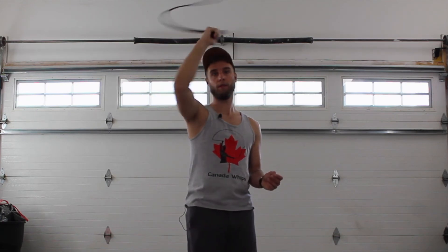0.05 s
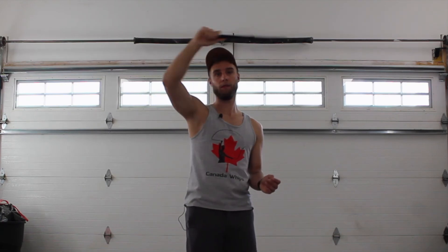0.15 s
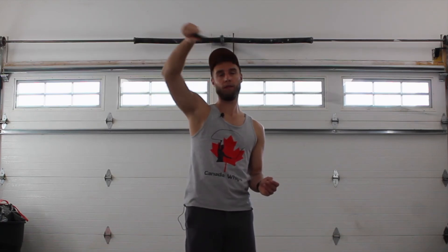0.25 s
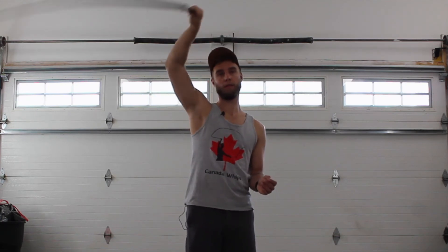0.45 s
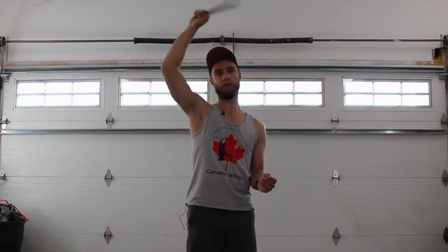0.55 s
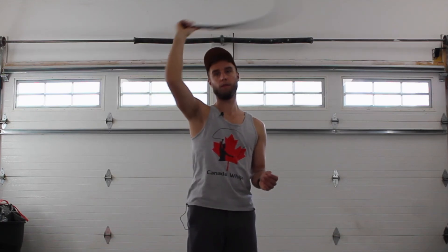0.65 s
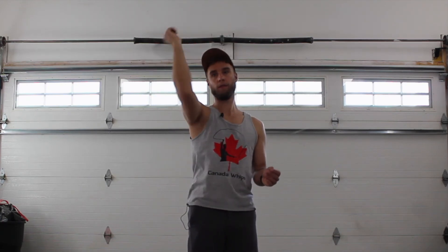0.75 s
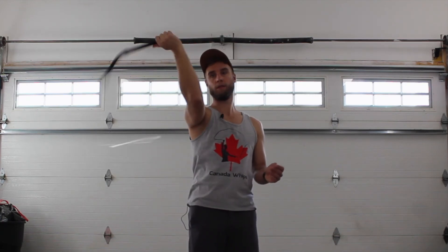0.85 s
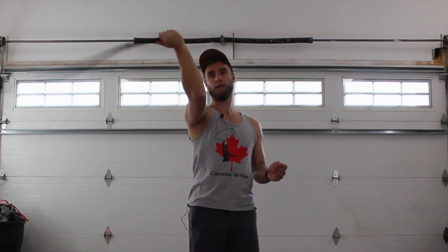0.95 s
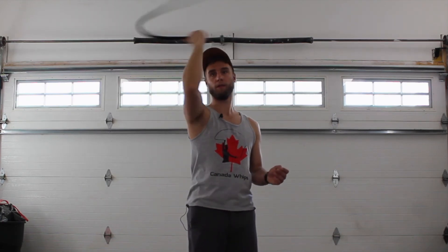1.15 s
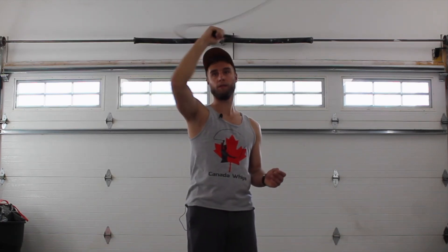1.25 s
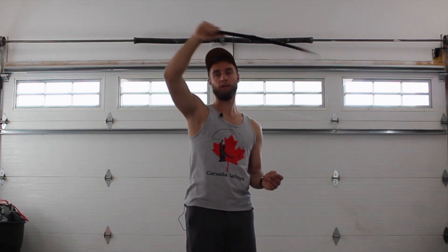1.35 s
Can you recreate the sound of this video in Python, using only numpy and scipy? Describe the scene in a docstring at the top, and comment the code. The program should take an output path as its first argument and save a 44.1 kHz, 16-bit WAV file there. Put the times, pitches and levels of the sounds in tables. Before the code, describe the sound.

A whip whistles softly through the air, then cracks loudly at about 0.25 seconds, ringing brightly off the walls of a closed garage. The lash swishes again from 0.6 seconds into a second sharp crack near 0.8 seconds. As that echo fades, a very faint swish and low hum lead to a weaker third crack at about 1.4 seconds. Tiny handling ticks and faint room noise lie underneath.

```python
"""A long whip is swung overhead and cracked three times in a closed, hard-walled garage.
The lash whistles through the air, then its tip throws a shock wave away from the microphone.
So the first snap is faint, while the echoes off the walls are far louder and merge into a bright
one-second ring. The whip and handle tick softly, and a low hum swells before the last crack.
Faint room noise lies underneath, and a noise suppressor swallows the end of each ring."""
import sys
import numpy as np
from scipy import signal
from scipy.fft import rfft, irfft
from scipy.io import wavfile
from scipy.ndimage import uniform_filter1d

SR = 44100
rng = np.random.default_rng(int(sys.argv[2]) if len(sys.argv) > 2 else 0)


def wav_out(sig):
    """Save sig, one row per channel (or a flat mono array), as 16-bit PCM at SR to the path in sys.argv[1]."""
    wavfile.write(sys.argv[1], SR, np.round(np.clip(np.atleast_2d(sig).T, -1, 1) * 32767).astype(np.int16))


N = 61739
T = np.arange(N) / SR
HZ = np.fft.rfftfreq(N, 1 / SR)


# Shock waves from the tip, arriving directly or off the nearest walls.
# Each row: start in seconds, peak level in dB, length in milliseconds.
SHOCKS = [(0.2095, -30, 0.31), (0.2139, -27.5, 0.15), (0.2162, -20, 0.4), (.222, -18, 0.13),
          (0.2307, -19, 0.076), (0.235, -14, 0.11), (.2437, -1, 0.066), (0.2539, -10, 0.26),
          (0.266, -7, 0.06), (.2718, -7, 0.24), (0.794, -24.5, 0.32), (0.8096, -15.5, .16),
          (0.8145, -9, 0.12), (0.821, -9, 0.097), (.8249, -6.5, 0.32), (.833, -11.5, 0.44),
          (.868, -10, 0.4), (1.377, -42, 1), (1.3863, -40, 0.11), (1.3906, -25.5, 0.26),
          (1.394, -11.5, 0.13), (1.398, -20.5, 0.19)]
def shock_wave(peak_db, length_ms, scatter_db=-5, scatter_fade_s=0.00033):
    """A snap: the air pressure jumps up, down and back like an N. Clutter scatters brief copies."""
    t = np.arange(600) / SR
    half_s = length_ms / 2000
    position = t / half_s - 1.5
    wave = -position / (1 + np.abs(position) ** 10)
    spray = rng.standard_normal(len(t)) * np.exp(-t / scatter_fade_s) * np.minimum(t / half_s / 10, 1)
    paths = signal.unit_impulse(len(t)) + amp(scatter_db) * spray / np.linalg.norm(spray)
    return amp(peak_db) * np.convolve(wave / np.abs(wave).max(), paths)


# The tone of a crack in the garage. Each row: frequency in Hz, relative level in dB.
CRACK_TONE = [(30, -47.5), (60, -38), (120, -17.5), (200, -12.5), (300, -5), (520, -1), (900, 0), (1500, 0),
              (2600, 0.5), (4600, 1), (7400, -3.5), (10000, -8.5), (13300, -9), (15000, -22.5),
              (16000, -39)]
# Surges of wall echoes, several to a crack. Each row: start in seconds, level in dB,
# treble slope in dB per octave, bass boost in dB, rise time in seconds.
ECHO_SURGES = [(0.2133, -32, 2, 2, 0.0022), (.2275, -19.5, 0.5, -25.5, 0.0034),
               (0.2406, -17.5, 0, -6.5, 0.012), (.277, -18, 0, -0.5, .007), (0.795, -28, -5, -3, 0.0025),
               (0.8072, -24, -2, -4.5, 0.0015), (0.8198, -15, -5.5, -3, 0.0024), (.842, -23, -8, 9, 0.015),
               (0.887, -28, -6.5, -9.5, 0.0017), (1.386, -41.5, -0.5, 26.5, 0.0015),
               (1.3905, -32.5, 2.5, 2, 0.0081)]
def echo_surge(level_db, slope_db, bass_db, rise_s, treble_hz=1762, bass_hz=308):
    """A crack comes back off the walls, swells and rings on."""
    treble = slope_db * np.log2(1 + (HZ / treble_hz) ** 2) / 2
    bass = bass_db / (1 + (HZ / bass_hz) ** 2)
    tone = unit(amp(look_up(CRACK_TONE, HZ))) * amp(level_db + treble + bass)
    return wall_echoes(tone) * np.minimum(T / rise_s, 1)


# How long the garage rings. Each row: frequency in Hz, seconds to fade by 60 dB.
RING_TIMES = [(80, 1.12), (250, 0.64), (550, 1.012), (1500, 1.185), (2800, 0.89), (4500, 0.86),
              (7500, 0.59), (11000, 0.41), (15000, 0.27)]
def wall_echoes(tone, first_per_s=9000, doubled_at_s=0.04, spread_db=2):
    """A shock bounces between hard walls. The echoes crowd ever closer and the treble dies first."""
    chance = np.minimum(first_per_s * (1 + (T / doubled_at_s) ** 2) / SR, 1)
    signs = rng.choice([-1., 1.], N)
    sizes = unit(signs * amp(spread_db * np.clip(rng.standard_normal(N), -2, 2)))
    echoes = sizes * (rng.random(N) < chance)
    echoes /= np.sqrt(np.abs(uniform_filter1d(echoes ** 2, size=300)) + 1e-9)  # even out the level
    hz, t, bands = signal.stft(irfft(rfft(echoes) * tone, N), SR, nperseg=256)
    fade = amp(-60 * t / look_up(RING_TIMES, hz)[:, None])
    return signal.istft(bands * fade, SR, nperseg=256)[1][:N]


# Whistles of the lash. Each row: middle in seconds, half length in seconds, pitch in Hz,
# glide in octaves per second, pitch spread in Hz, level in dB.
WHISTLES = [(-0.003, 0.074, 824, -2.1, 115, -44.5), (0.136, 0.031, 765, -1.24, 100.3, -48),
            (0.07, 0.049, 1426, -1.2, 190, -52.5), (0.191, 0.013, 550, -2, 350, -47),
            (0.635, 0.063, 850.6, -0.3, 250, -47), (.69, 0.058, 1710, -1.8, 353, -52),
            (0.779, 0.019, 600, -2.6, 500, -46), (0.775, 0.016, 1700, -2, 1500, -51.5),
            (1.27, 0.06, 1920, -2, 450, -66.5), (1.351, 0.024, 605, -2, 410, -76)]
def lash_whistle(middle_s, half_s, hz, glide, width_hz, level_db):
    """The lash sheds swirls of air, making a fuzzy whistle that swells and sinks in pitch."""
    flutter = 0.22  # 0 is even, 1 is fully ragged
    pitch = hz * 2 ** (glide * np.clip(T - middle_s, -2 * half_s, 2 * half_s))
    whistle = resonate(resonate(rng.standard_normal(N), pitch, width_hz), pitch, width_hz)
    strength = np.sqrt(np.abs(uniform_filter1d(whistle ** 2, size=400)) + 1e-20)
    return amp(level_db) * unit(whistle * strength ** (flutter - 1)) * swell(middle_s, half_s)


# Small ticks. Each row: start in seconds, pitch in Hz, pitch spread in Hz, peak level in dB.
WHIP_TICKS = [(.1245, 3070, 597, -44.5), (.1245, 7400, 1500, -47.5), (.739, 6900, 1790, -39.5),
              (.739, 10700, 2193, -47), (1.16, 11800, 1800, -53.5)]
def whip_tick(hz, width_hz, peak_db):
    """The whip or its handle gives a tiny click with a very short ring."""
    age = np.pi * width_hz * T
    return amp(peak_db) * age * np.exp(1 - age) * np.sin(2 * np.pi * hz * T)


def low_hum(hz=151, level_db=-56.5):
    """A faint low tone swells and fades around the last swing."""
    return amp(level_db) * swell(middle_s=1.27, half_s=0.096) * np.sin(2 * np.pi * hz * T)


# The tone of the quiet garage. Each row: frequency in Hz, relative level in dB.
AIR_TONE = [(25, -26.5), (60, -10.5), (150, -7.5), (400, -10), (900, -6.5), (2000, -14.5), (5000, -25.5),
            (9000, -30), (15000, -40)]
def room_air(level_db=-54.5):
    """The still air of the garage carries a faint, steady noise."""
    spectrum = rfft(rng.standard_normal(N)) * amp(look_up(AIR_TONE, HZ))
    return amp(level_db) * unit(irfft(spectrum, N))


# What the noise suppressor counts as quiet. Each row: frequency in Hz, threshold in dB (power per Hz).
QUIET_LIMITS = [(60, -75.5), (250, -80), (600, -79), (1000, -74.5), (2200, -85.5), (4000, -92.5),
                (8000, -100.5), (15000, -103)]
def suppress_noise(x, depth_db=-14.5, softness_db=3):
    """Turns down each frequency band while it is below its threshold."""
    framing = dict(nperseg=512, noverlap=384, scaling="psd")
    hz, _, bands = signal.stft(x, SR, **framing)
    power = uniform_filter1d(2 * np.abs(bands) ** 2, size=7, axis=-1)  # smooth over time
    power = uniform_filter1d(power, size=7, axis=-2)  # and over frequency
    over_db = 10 * np.log10(np.abs(power) + 1e-20) - look_up(QUIET_LIMITS, hz)[:, None]
    gain = amp(depth_db * (1 - np.tanh(over_db / softness_db / 2)) / 2)
    return signal.istft(bands * gain, SR, **framing)[1][:, :N]


def amp(db):
    """Turns decibels into a gain."""
    return 10 ** (np.asarray(db) / 20)


def unit(x):
    """Scales a signal to an average power of 1."""
    return x / np.sqrt(np.mean(x ** 2) + 1e-20)


def look_up(table, hz):
    """Blends between a table's rows on a log-frequency scale."""
    row_hz, values = np.transpose(table)
    return np.interp(np.log(hz + 1), np.log(row_hz + 1), values)


def swell(middle_s, half_s):
    """A bell-shaped rise and fall."""
    return np.exp(-((T - middle_s) / half_s) ** 2 / 2)


def resonate(x, hz, width_hz):
    """Keeps the part of a sound near the moving pitch hz."""
    turn = np.exp(2j * np.pi * np.cumsum(hz) / SR)
    feedback = np.exp(-np.pi * width_hz / SR)
    return 2 * (turn * signal.lfilter([1 - feedback], [1, -feedback], x / turn)).real


def add(mix, start_s, sound):
    """Mixes a sound in at its start time."""
    part = mix[round(start_s * SR):][:len(sound)]
    part += sound[:len(part)]


def scene():
    """Whistles, cracks and their echoes in the quiet garage."""
    mix = room_air() + low_hum()
    for start_s, *row in ECHO_SURGES:
        add(mix, start_s, echo_surge(*row))
    for row in WHISTLES:
        mix += lash_whistle(*row)
    for start_s, *row in SHOCKS:
        add(mix, start_s, shock_wave(*row))
    for start_s, *row in WHIP_TICKS:
        add(mix, start_s, whip_tick(*row))
    return mix[None]


def record(dry, ceiling=0.85, top_hz=15700):
    """The microphone rounds the highest peaks; then quiet bands are turned down and the top is cut."""
    rounded = ceiling * np.tanh(dry / ceiling)
    low_pass = signal.firwin(511, top_hz, window=("kaiser", 9), fs=SR)
    return signal.oaconvolve(suppress_noise(rounded), low_pass[None], "same")


dry = scene()
out = record(dry)
wav_out(out)
```